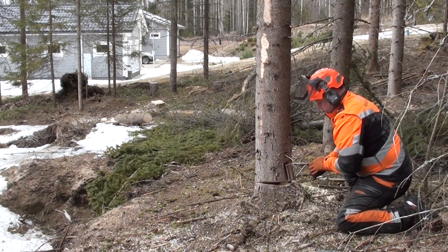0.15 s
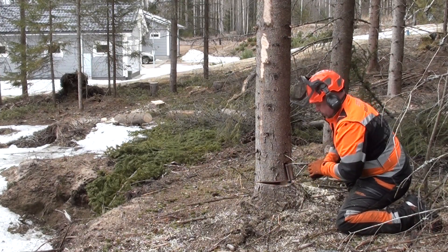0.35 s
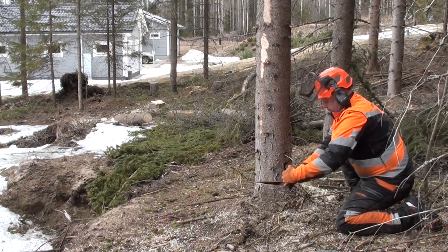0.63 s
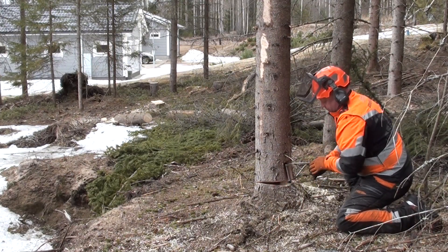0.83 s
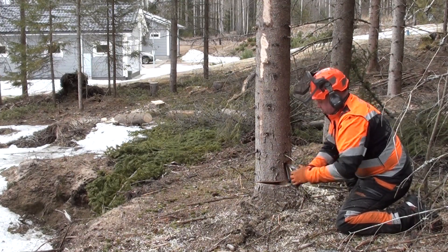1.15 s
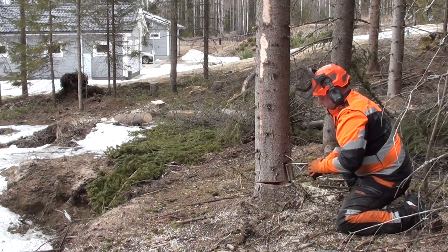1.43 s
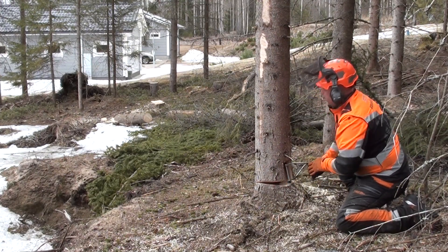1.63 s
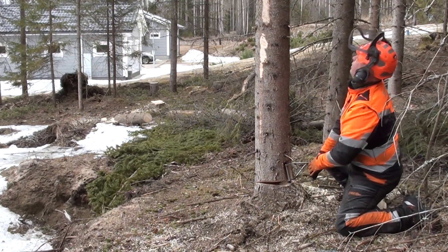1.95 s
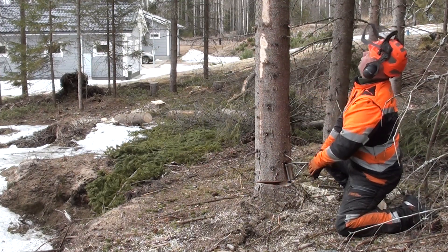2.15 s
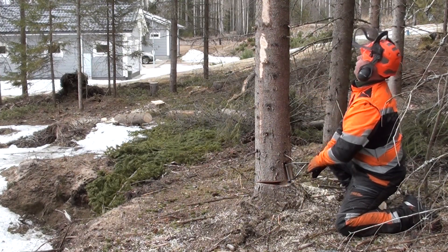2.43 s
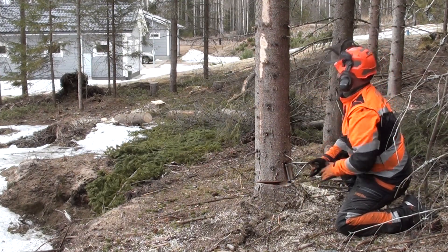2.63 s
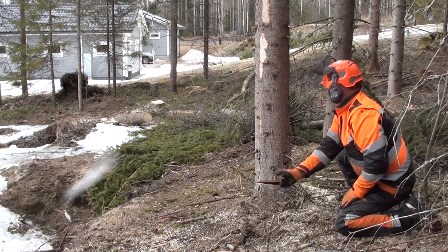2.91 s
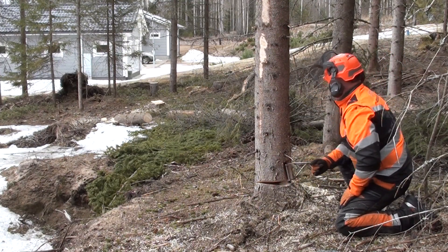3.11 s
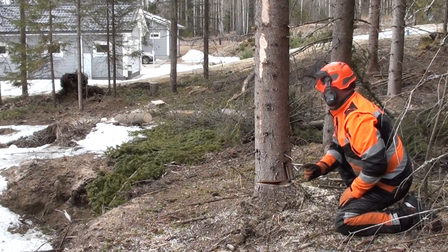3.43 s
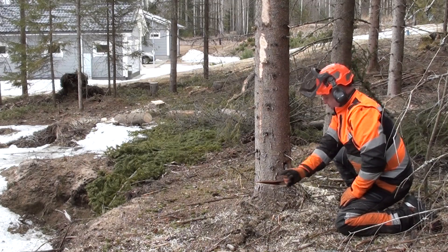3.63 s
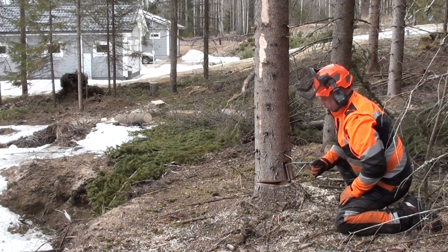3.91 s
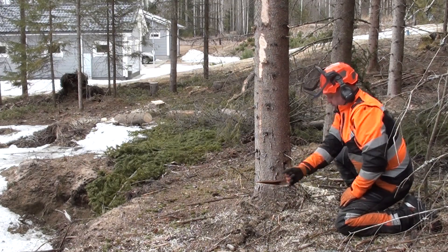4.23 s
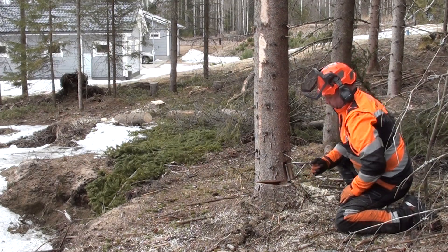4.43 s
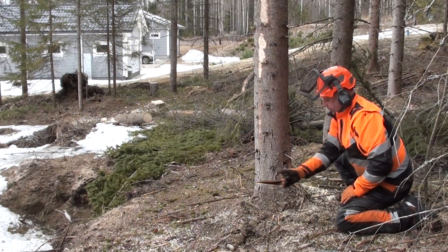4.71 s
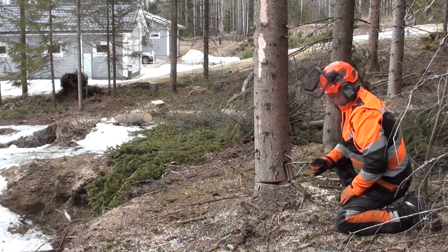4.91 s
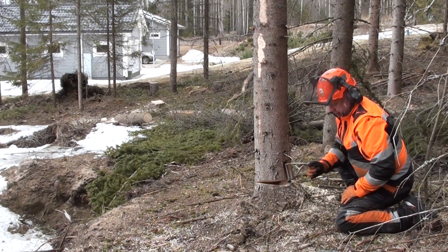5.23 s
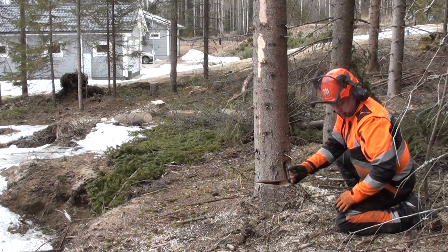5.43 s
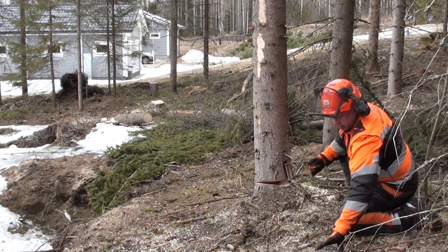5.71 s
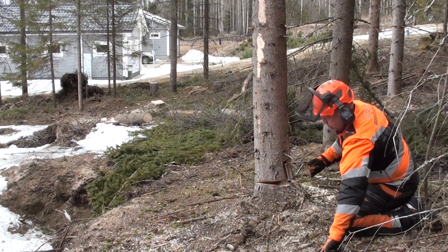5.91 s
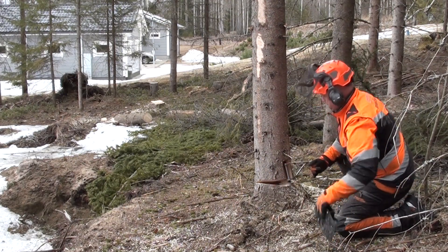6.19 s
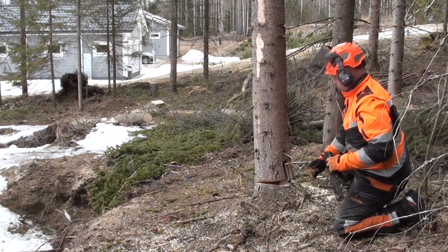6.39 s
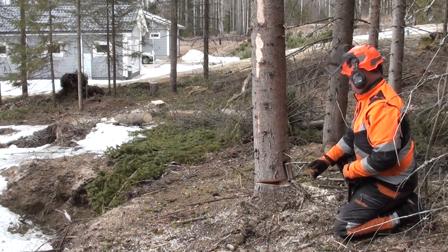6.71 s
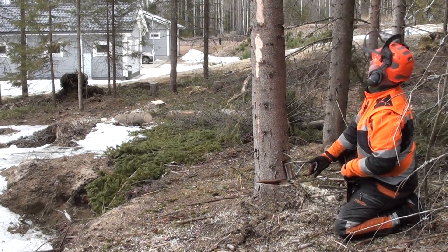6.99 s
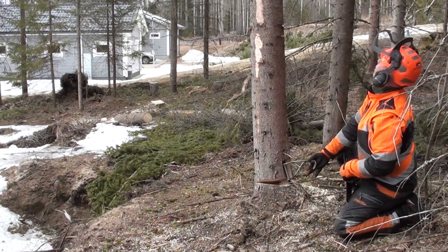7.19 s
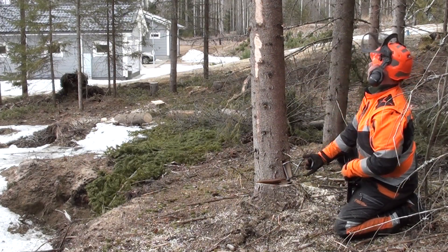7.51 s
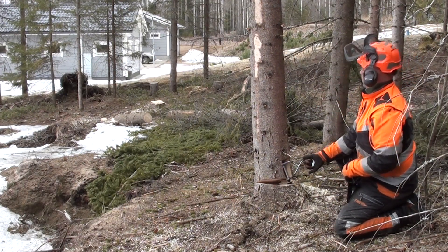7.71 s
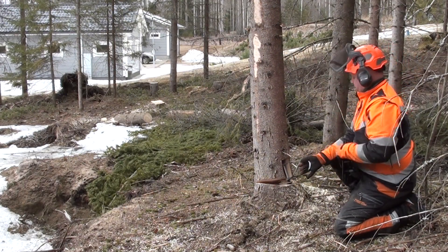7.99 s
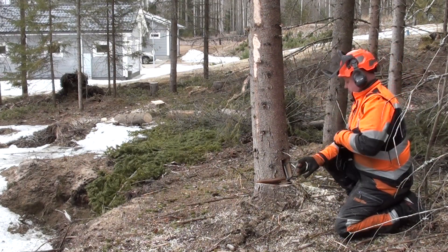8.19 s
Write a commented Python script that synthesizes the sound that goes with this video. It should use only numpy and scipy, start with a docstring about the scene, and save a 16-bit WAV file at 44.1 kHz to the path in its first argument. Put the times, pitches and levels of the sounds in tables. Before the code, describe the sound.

A steel ratchet jack is cranked close to the microphone in a forest, each stroke a quick, bright rasp of about twenty ringing clicks. Two strokes come at about 0.5 and 1.1 seconds. In the pause, the tree trunk gives three sharp snaps between 1.8 and 2.3 seconds. Five more strokes follow at 2.8, 3.5, 4.1, 4.7 and 5.3 seconds, with a few light knocks of lever and wood. Loud cracks break in at 4.5 and 5 seconds, with dull thuds deep in the trunk. From about 5.7 seconds the wood fibres crackle irregularly without the ratchet, densest from 7 seconds to the end at about 8.3. Bark, needles and clothing rustle softly, more so in the second half. Faint far traffic hums throughout, and light wind nudges the microphone, mostly early on.

```python
"""A ratchet jack, close to the microphone, is cranked in the felling cut of a tree: in each of seven
strokes the pawl rattles over the teeth and rings the steel. As the trunk starts to give, wood fibres
snap, lever and wood knock, and deep breaks shake the trunk. Ground and trunks scatter each click.
Bark, needles and clothing rustle nearby; far traffic hums and light wind nudges the microphone."""
import sys
import numpy as np
from scipy import signal
from scipy.fft import rfft, irfft
from scipy.io import wavfile
from scipy.ndimage import uniform_filter1d

SR = 44100
rng = np.random.default_rng(int(sys.argv[2]) if len(sys.argv) > 2 else 0)


def int16_out(signal):
    """Quantize to a 16-bit WAV file."""
    q = np.round(np.clip(np.atleast_2d(signal).T, -1, 1) * 32767)
    wavfile.write(sys.argv[1], SR, q.astype(np.int16))


N = 368235

# Handle travel, one list a stroke. Each row: time in seconds, teeth passed.
HANDLE_TRAVEL = [
    [(.4629, 0), (.494, 2), (.5318, 5), (.5732, 9), (.6501, 18), (.6744, 20), (.699, 21)],
    [(1.1204, 0), (1.1365, 1), (1.1626, 3), (1.1958, 6), (1.2136, 8), (1.2787, 16), (1.3094, 19),
     (1.324, 20)],
    [(2.8118, 0), (2.8228, 1), (2.9046, 12), (2.9353, 16), (2.9597, 19), (2.9698, 20), (2.985, 21)],
    [(3.4739, 0), (3.4858, 1), (3.5043, 3), (3.521, 5), (3.5597, 10), (3.6233, 19), (3.6402, 21)],
    [(4.0673, 0), (4.0915, 2), (4.1112, 4), (4.129, 6), (4.1605, 10), (4.2127, 17), (4.2302, 19),
     (4.2448, 20)],
    [(4.6503, 0), (4.6633, 1), (4.6849, 3), (4.715, 6), (4.7327, 8), (4.77, 13), (4.8192, 20), (4.829, 21)],
    [(5.2735, 0), (5.2879, 1), (5.3122, 3), (5.3643, 8), (5.3902, 11), (5.4277, 15), (5.4499, 17),
     (5.463, 18), (5.484, 19)],
]
# Each stroke at its first, middle and last tooth. Each row: level in dB, upper ring in dB re level,
# tuning factor of the pawl ring, tuning factor of the upper ring, jack body in dB re level.
STROKE_SOUND = [
    [(-27, -2, 1.08, .99, -9.5), (-24, -6.5, 0.99, 0.96, -11.5), (-27.5, -0.5, 0.94, 1, -11)],
    [(-23.5, -5.5, 1.01, 1.02, -13.5), (-23.5, -5.5, 1.04, .99, -14.5), (-25.5, -5, 0.97, 1.001, -10)],
    [(-28.5, 1, 1.03, 1.03, -10.5), (-23.5, -4, 1.045, 1.02, -13), (-27.5, -5, 1.07, .99, -8.5)],
    [(-22, -8.5, 0.98, 0.97, -14.5), (-23.5, -0.5, 0.99, 1.05, -11), (-24, -7, .95, 1, -11)],
    [(-24, -1.5, 1.05, 1.02, -10), (-23, -9, 1.035, 0.99, -14), (-30.5, 3, 0.97, 0.99, -4)],
    [(-26, -1, 0.99, 0.99, -10), (-26, -7.5, 1.1, 1.03, -14), (-23, -8, 1.04, 1, -11)],
    [(-29.5, 5.5, 1.03, 0.99, -8.5), (-25.5, -2, 1.08, 0.98, -12), (-27.5, -1.5, 1.045, 0.96, -12)],
]
# Steel modes. Each row: centre in Hz, width in Hz, relative level in dB.
PAWL_MODES = [(5460, 520, -6.5), (6310, 750, 1.5), (7200, 1110, 1), (7400, 680, -1), (8800, 660, -17.5)]
PAWL_UPPER_MODES = [(10170, 1100, 17), (10900, 1200, 4.5), (10880, 920, 7.5), (13300, 1200, -18),
                    (14300, 5000, -30)]
JACK_BODY_MODES = [(825, 163, -12), (985, 66, -5), (1150, 350, -17), (1562, 97, -8.5), (1948, 81, -11),
                   (2270, 150, -12.5), (3030, 480, -13.5), (3590, 220, -8.5), (4600, 1400, -17.5)]

# Fibres snapping in the cut. Each row: start in seconds, level in dB, knock and fizz in dB re level,
# length in milliseconds.
FIBRE_SNAPS = [(0.9022, -55, 1.5, 3, 1.5), (1.0034, -48, -17, -1, 0.8), (1.393, -40, -4, -13, 3.2),
               (1.733, -40, -7, -23, 0.3), (1.8327, -21.5, -20.5, -7.5, 0.86), (1.9065, -43.5, -4, -5, 1.7),
               (2.073, -45, -1, -6, 0.33), (2.1068, -20, -17.5, -11.5, 1.55),
               (2.2038, -44.5, -11, -16, 0.55), (2.2629, -22, -16, -7.5, 1.57),
               (2.6953, -50.5, -0.5, -27, 0.16), (3.7382, -49, -2.5, -15, 3.6),
               (4.5412, -19.5, -6, -10, 1.64), (4.5534, -21, -9.5, -22, 0.65),
               (4.6039, -27, -12, -13, 0.91), (4.8671, -34, 0.5, -21, 2.1), (4.9943, -25.5, -6, -29, 0.5),
               (5.0264, -23, -6.5, -5, 0.47), (5.0353, -18.5, -6, -11, 2.9), (5.0473, -25, -9, -15, 4.1),
               (5.0741, -18, -6, -17, 1.05), (5.125, -37.5, -6, -10, 1.3), (5.2343, -49, -2, -4, 1.6),
               (5.7017, -39.5, -5.5, -1, 0.76), (5.7698, -35, -22, -9, 1.3), (5.8889, -21, -2, -29, 0.58),
               (5.9403, -32, 3.5, -2, 0.41), (5.9526, -24, -6.5, -15, 0.92), (5.9994, -30.5, -24, -16, 0.9),
               (6.1609, -29, -8, -7, 1.6), (6.2984, -32, -6, -11, 0.63), (6.3167, -27, -1, -4, 0.7),
               (6.3562, -26, -9, -29, 3.2), (6.4173, -35, -10, -12, 1.24), (6.472, -39, -4, -17, 0.72),
               (6.4993, -39, -3, -8, 1.1), (6.5406, -32.5, -10.5, -22, 0.86), (6.7537, -43.5, -4, -8, 0.62),
               (6.8184, -32.5, -11, -8, 0.97), (6.9164, -18, -8.5, -14, 0.96), (6.9286, -29, -33, -6, 0.16),
               (6.9342, -24.5, -9.5, -13, 1.18), (7.1163, -16.5, -9.5, -10, 0.37),
               (7.1288, -32, -4, -10, 0.92), (7.1639, -19.5, -16, -15, 0.53), (7.17, -25.5, -2.5, -6, 0.47),
               (7.1889, -25, -28, -20, 0.23), (7.2224, -25.5, -8.5, -3, 0.31),
               (7.4057, -17, -3.5, -22, 0.54), (7.4182, -30, -12, -8, 1), (7.4254, -32, -21, -18, 0.36),
               (7.4639, -38.5, -14, -9, 0.27), (7.475, -47, 4, -9, 2.03), (7.5157, -39.5, -9, -6, 1.2),
               (7.5308, -39, -8, -4, 0.27), (7.5859, -20, -15.5, -8, 0.46), (7.6161, -37, -10, -14, 0.53),
               (7.6392, -22, -11.5, -8, 0.35), (7.6519, -36, -5, -8, 1.4), (7.6884, -35.5, -1, -10, 1.4),
               (7.8008, -27, -13.5, -28, 0.17), (7.8615, -38.5, -6.5, -14, 0.61),
               (7.883, -41.5, 0, -3, 0.98), (7.9443, -41.5, -7, -6, 2.8), (7.9908, -26.5, -8, -22, 0.4),
               (8.0037, -20.5, -3, -19, 1.1), (8.0389, -39.5, -0.5, -9, 1.2),
               (8.1114, -20.5, -13.5, -7, 0.43), (8.1587, -18.5, -9, -22, 0.38), (8.2005, -36.5, -15, 0, 2),
               (8.2247, -39, -8, -17, 0.67), (8.2362, -34, -14, -14, 1.3), (8.2557, -33, -9, -4, 0.86),
               (8.2935, -17.5, -4, -29, 0.62), (8.3061, -29, -10, -21, 0.61), (8.3294, -33, -3, -15, 1.6),
               (8.3402, -22, -22, -8, 0.39)]
# Wood modes, low to high. Each row: centre in Hz, width in Hz, relative level in dB.
WOOD_KNOCK_MODES = [(1050, 540, -1.5), (1640, 690, 1.5), (2380, 1120, -1), (3300, 460, 4), (4320, 2300, -9)]
WOOD_SNAP_MODES = [(5875, 1350, -6.5), (6430, 1030, 4), (7915, 1200, -3)]
WOOD_FIZZ_MODES = [(9240, 690, 10), (12600, 6000, -2.5), (13000, 5400, -13)]
# Knocks of lever and wood; dull low thumps, mostly wind buffeting the microphone.
# Each row: start in seconds, level in dB, pitch in Hz.
KNOCKS = [(1.363, -42, 814), (1.731, -38, 4700), (2.107, -37, 3600), (2.695, -41, 4830), (2.778, -45, 996),
          (2.856, -38, 917), (2.985, -41.5, 1036), (3.087, -36.5, 957), (3.646, -44, 984),
          (3.745, -43, 880), (4.5412, -21.5, 2720), (4.54, -15.5, 3400), (4.863, -31, 1580),
          (6.335, -34.5, 1150), (6.36, -38.5, 1140), (7.407, -28.5, 1535), (7.4062, -24, 3520)]
LOW_THUMPS = [(.6, -50, 60), (1.19, -45.5, 79), (1.839, -50.5, 285), (2.118, -52, 91), (2.858, -49, 225),
              (3.022, -50, 92), (3.137, -49, 130), (3.166, -53, 55), (3.647, -52, 204), (3.745, -55, 149)]
# Breaks deep in the trunk. Each row: start in seconds, level in dB, upper modes in dB re level.
DEEP_BREAKS = [(4.562, -48, -25), (5.0344, -40.5, 1.5), (5.056, -35.5, -10.5), (7.116, -49.5, -12),
               (7.433, -49.5, -25), (8.294, -50, -20)]
# Trunk modes. Each row: pitch in Hz, level in dB re the break, seconds to die by 60 dB.
TRUNK_MODES = [(109, -7, 0.066), (184, -1, .12), (226, -3.5, 0.15), (350, -15, 0.036), (537, 4, 0.043),
               (714, 10, 0.038), (1280, 16.5, 0.013)]

# Nearby rustle and wind on the microphone. Each row: time in seconds, level in dB.
RUSTLE_LEVEL = [(0.0, -35), (0.11, -66), (0.24, -56), (0.45, -62), (0.75, -59), (0.9, -55), (1.1, -65),
                (1.4, -55), (1.8, -57), (1.98, -53.5), (2.27, -65), (2.55, -68.5), (2.8, -57.5),
                (3.01, -62), (3.116, -55.5), (3.3, -57.5), (3.46, -65), (3.74, -53.5), (3.86, -62.5),
                (4.05, -57), (4.55, -55), (4.63, -39), (4.86, -73), (5.078, -37.5), (5.194, -50),
                (5.5, -58), (5.742, -52.5), (5.87, -59), (5.9, -50), (6.082, -45.5), (6.175, -38.5),
                (6.195, -48.5), (6.365, -43), (6.385, -50), (6.5, -51.5), (6.92, -58.5), (7.09, -56),
                (7.234, -48), (7.39, -58), (7.5, -50), (7.78, -54), (7.96, -54.5), (8.268, -48),
                (8.35, -39)]
WIND_LEVEL = [(0.0, -63), (0.43, -70), (0.7, -55.5), (1.2, -58), (1.5, -66), (2.0, -71), (2.2, -62),
              (2.8, -68), (3.1, -58), (3.3, -71), (8.35, -71)]
# Slow swell of the far traffic. Each row: time in seconds, level in dB re TRAFFIC_DB.
TRAFFIC_SWELL = [(0.0, 0.2), (2.4, -1.3), (5.3, 0.44), (8.35, -0.7)]
# Noise spectra. Each row: frequency in Hz, relative density in dB.
RUSTLE_FIZZ_TONE = [(2350, -39), (4000, -30), (4920, -9), (5640, 1.5), (7960, 2), (10500, -10),
                    (16000, -25), (16500, -40)]
RUSTLE_BODY_TONE = [(900, -36), (1500, 1), (2500, 6.5), (3800, 8), (5000, -0.5)]
TRAFFIC_TONE = [(15, -35), (25, -34), (63, -12), (146, -10.5), (192, -8.5), (226, -6), (296, -6.5),
                (339, -5), (389, -5.5), (706, -1), (1730, -13), (14800, -29), (16500, -19.5)]
WIND_TONE = [(15, -15), (40, -8.5), (100, 9), (160, 0), (260, -52.5)]
# Stereo image at the microphone. Each row: frequency in Hz, left-right likeness (1 is identical).
RUSTLE_LIKENESS = [(500, 1), (3000, 0.95), (12000, 1)]
TRAFFIC_LIKENESS = [(60, 1), (240, 0.88), (950, 0.85), (3770, 0.41), (15000, 1)]
WIND_LIKENESS = [(20, .97), (60, .88), (130, 0.99)]

TRAFFIC_DB, LOUD_RUSTLE_DB = -48.5, -39.5  # rustle body and faint snaps are set against a loud rustle


def ratchet():
    """The pawl drops, chatters on the tooth and rings; its drag over the next shakes the jack body."""
    s, level_db, upper_db, tuning, upper_tuning, body_db = teeth()[:, :, None]
    jitter, loudness, brightness = rng.standard_normal((len(s), 3)).T[:, :, None]
    drop = chatter(len(s), size=1024, rise_s=0.00034, fall_s=0.0023, lumpy_db=-2.5, strike=4.0)
    drag = chatter(len(s), size=1024, rise_s=0.00023, fall_s=0.0047, lumpy_db=2.5, strike=2.4)
    pawl = ring(drop, PAWL_MODES, detune=0.022, spread_db=1.3, tuning=tuning)
    upper = ring(drop, PAWL_UPPER_MODES, detune=0.012, spread_db=1.2, tuning=upper_tuning)
    body = ring(drag, JACK_BODY_MODES, detune=0.007, spread_db=1.2)
    steel = pawl + gain_of(upper_db + 1.1 * brightness) * upper + gain_of(body_db) * body
    starts = s + 0.0003 * jitter - 0.0004
    return place(starts, gain_of(level_db + 0.82 * loudness) * steel, spread=0.0073)


def teeth():
    """One column for each tooth passed: its time, then STROKE_SOUND read along the stroke."""
    strokes = []
    for travel, sound in zip(HANDLE_TRAVEL, STROKE_SOUND):
        s, passed = np.transpose(travel)
        tooth = np.arange(passed[-1] + 1)
        along = [np.interp(tooth / passed[-1], (0, 0.5, 1), column) for column in np.transpose(sound)]
        strokes.append([np.interp(tooth, passed, s), *along])
    return np.concatenate(strokes, axis=1)


def chatter(count, size, rise_s, fall_s, lumpy_db, strike):
    """Contact force, one blow a row: a sharp strike amid micro-impacts that die quickly."""
    t = np.arange(size) / SR
    grains, lumps = rng.standard_normal((count, 2, size)).transpose(1, 0, 2)
    lumps = unit_rms(uniform_filter1d(lumps, size=16, axis=1))
    spike = strike * (np.arange(size) == np.round(rise_s * SR))
    return (grains * gain_of(lumpy_db * lumps) + spike) * (1 - np.exp(-t / rise_s)) * np.exp(-t / fall_s)


def ring(blows, modes, detune, spread_db, tuning=1):
    """Each blow rings the modes, every time tuned and weighted a little differently."""
    size = 2 * blows.shape[1]
    hz = np.fft.rfftfreq(size, 1 / SR)
    chance = rng.standard_normal((len(blows), 2 * len(modes)))
    response = 0
    for k, (centre_hz, width_hz, db) in enumerate(modes):
        centre = centre_hz * (tuning + detune * chance[:, k, None])
        weight = (-1) ** k * gain_of(db + spread_db * chance[:, -1 - k, None])
        response += weight / (1 + 2j * (hz - centre) / width_hz)  # one pole: a dying sine
    response *= 1j * hz / (modes[0][0] + 1j * hz)  # small parts radiate little below their first mode
    rung = irfft(rfft(blows, size) * response)
    return rung / np.sqrt(np.mean(rung[:, :170] ** 2, axis=1, keepdims=True))  # unit RMS over the attack


def fibre_cracks():
    """A fibre lets go in about a millisecond; splinters around it crunch on for a moment."""
    s, level_db, knock_db, fizz_db, length_ms = np.r_[FIBRE_SNAPS, faint_snaps(count=36)].T[:, :, None]
    length = np.clip(length_ms, 0.1, 6) / 1000
    tear = chatter(len(s), size=1024, rise_s=0.51 * length, fall_s=0.98 * length, lumpy_db=4.5, strike=8)
    splinters = chatter(len(s), size=4096, rise_s=0.0014, fall_s=0.027, lumpy_db=6.5, strike=0)
    snap = gain_of(level_db) * timber(tear, knock_db, fizz_db, detune=0.053, spread_db=1.96)
    crunch_db = level_db - 16.5 + 1.07 * knock_db  # deep breaks splinter most
    crunch = gain_of(crunch_db) * timber(splinters, knock_db, fizz_db, detune=0.039, spread_db=2.2)
    return place(s - 0.0005, snap, spread=0.072) + place(s, crunch, spread=0.071)


def faint_snaps(count, crowding=2.2, scatter_db=2.5):
    """Random rows like FIBRE_SNAPS, crowding towards the end as the strain grows."""
    s = 0.01 + rng.random(count) ** (1 / crowding) * (N / SR - 0.02)
    loudness, knock, fizz, length = rng.standard_normal((count, 4)).T
    rustle_db = np.interp(s, *np.transpose(RUSTLE_LEVEL)) - LOUD_RUSTLE_DB
    level_db = -42 + 0.59 * rustle_db + scatter_db * loudness  # louder where the wood rustles
    return np.c_[s, level_db, scatter_db * knock - 4, scatter_db * fizz - 8, 0.68 * np.exp(length / 2)]


def timber(blows, knock_db, fizz_db, detune, spread_db):
    """Broad wood modes that die at once: a snap with fizz above it and a knock below."""
    snap = ring(blows, WOOD_SNAP_MODES, detune, spread_db)
    fizz = ring(blows, WOOD_FIZZ_MODES, detune, spread_db)
    knock = ring(blows, WOOD_KNOCK_MODES, detune, spread_db)
    return snap + gain_of(fizz_db) * fizz + gain_of(knock_db) * knock


def thuds(knock_cycles=51, thump_t60=0.14, upper_hz=400, bass_hz=170):
    """Knocks, low thumps and deep breaks: dying tones, roughened by an uneven level."""
    rows = [(s, db, hz, knock_cycles / hz) for s, db, hz in KNOCKS]
    rows += [(*thump, thump_t60) for thump in LOW_THUMPS]
    rows += [(s, break_db + db + upper_db * (hz > upper_hz), hz, t60)
             for s, break_db, upper_db in DEEP_BREAKS for hz, db, t60 in TRUNK_MODES]
    s, level_db, hz, t60 = np.transpose(rows)[:, :, None]
    t = np.arange(8000) / SR
    uneven = unit_rms(uniform_filter1d(rng.standard_normal((len(s), len(t))), size=60, axis=1))
    envelope = 2 * gain_of(level_db - 60 * t / t60) * (1 - np.exp(-t / 0.0011))
    sounds = envelope * np.sin(2 * np.pi * hz * t) * (1 + 1.08 * uneven)
    low = hz < bass_hz  # only these keep their deep bass, and they come from either side
    sounds -= ~low * uniform_filter1d(sounds, size=400, axis=1)
    return place(s, sounds * low, spread=0.25) + place(s, sounds * ~low, spread=0.03)


def place(starts, sounds, spread):
    """Lays sounds out in time; each reaches the two microphone ports a little differently."""
    ports = np.zeros((2, N + sounds.shape[1]))
    for s, sound, side in zip(starts[:, 0], sounds, rng.standard_normal(len(starts))):
        at = round(s * SR)
        treble = np.diff(sound, n=2, prepend=[0, 0])
        sideways = spread * side * (np.roll(sound, shift=3) + 0.51 * treble)
        ports[:, at:at + len(sound)] += [sound + sideways, sound - sideways]
    return ports[:, :N]


def forest(clicks, near_db, near_t60, far_db, far_t60, likeness):
    """Ground and trunks scatter each click back to the microphone: a short halo and a longer tail."""
    t = np.arange(SR // 3) / SR
    taps = rng.standard_normal((2, 2, len(t))) * (rng.random((2, 1, len(t))) < 0.1) * (t > 0.002)
    taps[:, 1] = likeness * taps[:, 0] + np.sqrt(1 - likeness ** 2) * taps[:, 1]
    response = 0
    for echoes, db, t60 in zip(taps, (near_db, far_db), (near_t60, far_t60)):
        echoes = echoes * gain_of(-60 * t / t60)
        response += gain_of(db) * echoes / np.linalg.norm(echoes, axis=1, keepdims=True)
    return signal.fftconvolve(clicks.mean(axis=0)[None], response, axes=1)[:, :N]


def rustle(ticks_per_s=70, tick_s=0.0013):
    """Bark, needles and clothing at one spot nearby: a grainy hiss with tiny ticks riding on it."""
    body_level = [(s, -42 + 0.99 * (db - LOUD_RUSTLE_DB)) for s, db in RUSTLE_LEVEL]
    fizz = hiss(RUSTLE_FIZZ_TONE, RUSTLE_LEVEL, RUSTLE_LIKENESS, patchy_db=1.5, flicker_db=2.5, size=128)
    body = hiss(RUSTLE_BODY_TONE, body_level, RUSTLE_LIKENESS, patchy_db=2.5, flicker_db=2.5, size=256)
    impulses = (rng.random(N) < ticks_per_s / SR) * rng.exponential(0.54, N)
    ticks = signal.lfilter([1], [1, -np.exp(-1 / (tick_s * SR))], impulses)
    return (fizz + body) * (1 + ticks)


def wind():
    """Light gusts nudge the microphone: a low, fluttering rumble."""
    return hiss(WIND_TONE, WIND_LEVEL, WIND_LIKENESS, patchy_db=1.6, flicker_db=5.0, size=512)


def far_traffic():
    """Traffic a long way off: a broad hum that swells a little."""
    level = [(s, TRAFFIC_DB + db) for s, db in TRAFFIC_SWELL]
    return hiss(TRAFFIC_TONE, level, TRAFFIC_LIKENESS, patchy_db=0.8, flicker_db=0.4, size=1024)


def hiss(tone, level, likeness, patchy_db, flicker_db, size):
    """Stereo noise of one spectrum that follows a level curve, with patches and broadband flicker."""
    hop = size // 4
    frames, hz = N // hop + 5, np.fft.rfftfreq(size, 1 / SR)
    left_re, left_im, other_re, other_im, patches = rng.standard_normal((5, len(hz), frames))
    patches = uniform_filter1d(patches, size=size // 64, axis=0)
    patches = unit_rms(uniform_filter1d(patches, size=4096 // size * 3, axis=1))
    flicker = unit_rms(uniform_filter1d(rng.standard_normal(frames), size=3))
    shared = value_at(likeness, np.maximum(hz, likeness[0][0]))[:, None]
    left = left_re + 1j * left_im
    right = shared * left + np.sqrt(1 - shared ** 2) * (other_re + 1j * other_im)
    colour = gain_of(value_at(tone, hz)[:, None] + patchy_db * patches + flicker_db * flicker)
    _, noise = signal.istft(np.array([left, right]) * colour, nperseg=size, noverlap=size - hop)
    level_db = np.interp(np.arange(N) / SR, *np.transpose(level))
    return gain_of(level_db) * unit_rms(noise[:, :N])


def value_at(points, hz):
    """Reads a curve over log frequency; below its first point it lies 30 lower."""
    point_hz, values = np.transpose(points)
    return np.interp(np.log(hz + 1), np.log(point_hz + 1), values, left=values[0] - 30)


def gain_of(db):
    return 10 ** (np.asarray(db) / 20)


def unit_rms(x):
    return x / np.sqrt(np.mean(x ** 2) + 1e-20)


def scene():
    """Jack and trunk up close, the forest around them, wind and traffic behind."""
    steel = ratchet()
    wood = fibre_cracks() + thuds()
    steel += forest(steel, near_db=-19, near_t60=0.018, far_db=-12.5, far_t60=0.085, likeness=0.98)
    wood += forest(wood, near_db=-13.5, near_t60=0.0084, far_db=-50, far_t60=0.36, likeness=0.9)
    background = wind() + far_traffic()
    return steel + wood + rustle() + background


def record(dry):
    """The microphone: a slightly more sensitive right port, then a band limit at 15.9 kHz."""
    ports = dry * gain_of([[-0.15], [0.15]])
    lowpass = signal.firwin(255, 15900, window=("kaiser", 8), fs=SR)
    return signal.oaconvolve(ports, lowpass[None], "same")


dry = scene()
out = record(dry)
int16_out(out)
```